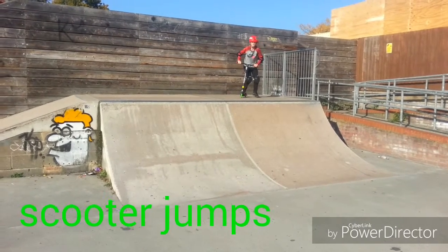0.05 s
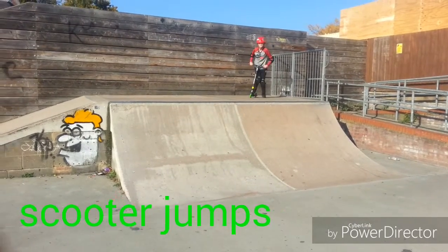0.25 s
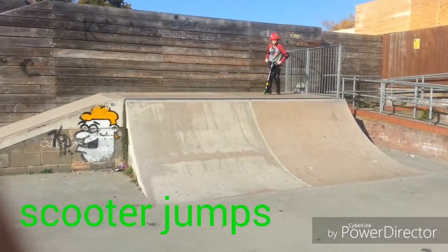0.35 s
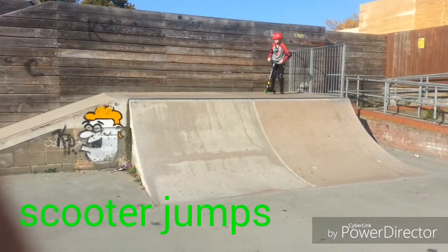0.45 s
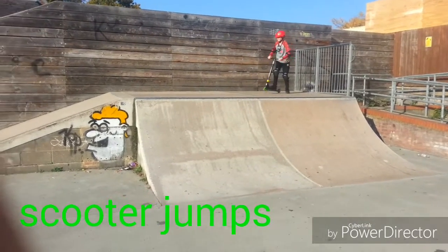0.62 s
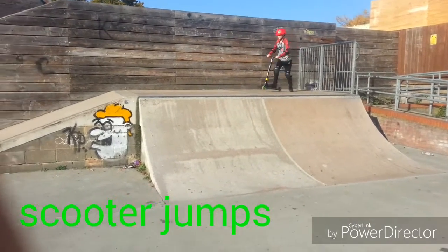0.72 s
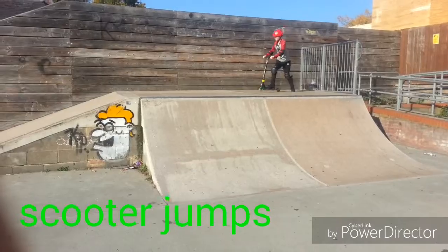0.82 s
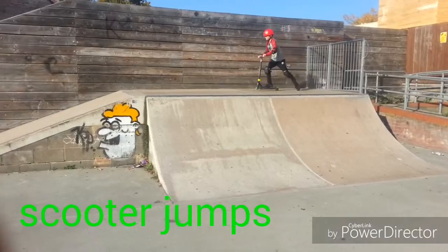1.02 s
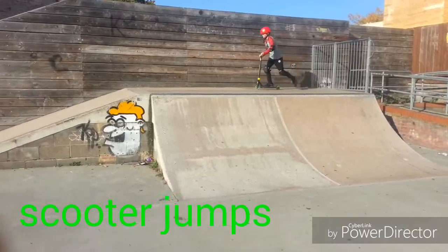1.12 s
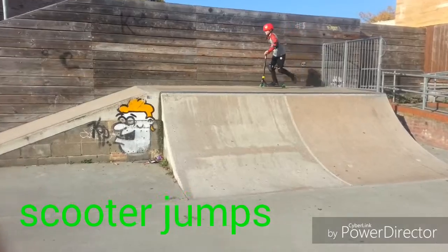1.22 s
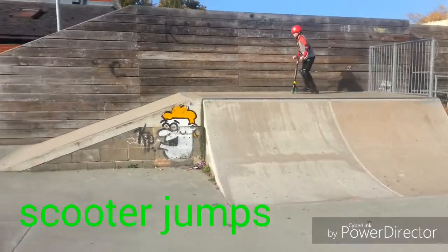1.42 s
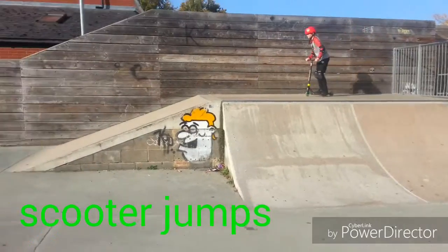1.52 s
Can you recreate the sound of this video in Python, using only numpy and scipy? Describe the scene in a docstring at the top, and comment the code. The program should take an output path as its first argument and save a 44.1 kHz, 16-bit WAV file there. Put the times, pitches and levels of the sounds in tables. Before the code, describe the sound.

Stunt scooter lands twice on concrete with rattling metallic knocks, over dull microphone handling thuds.

```python
"""A concrete skatepark. Close on the left a stunt scooter rolls, rattles and lands twice: knocks crack
through its deck and set its metal parts ringing. Farther off on the right another rolls along a ramp deck,
squeaks and clacks. Walls return a short echo, with the town faint in the distance. Right at the
microphones a finger shifting on the phone thuds and rumbles, mostly on the right one."""
import sys
import numpy as np
from scipy import signal
from scipy.fft import rfft, irfft
from scipy.io import wavfile
from scipy.ndimage import uniform_filter1d

SR = 44100
rng = np.random.default_rng(int(sys.argv[2]) if len(sys.argv) > 2 else 0)


def transcribe(signal):
    """Save signal, clipped to [-1, 1], as a 16-bit WAV file at the path in sys.argv[1]."""
    frames = np.atleast_2d(signal).T
    limited = np.clip(frames, -1, 1)
    pcm = np.round(limited * 32767).astype(np.int16)
    wavfile.write(sys.argv[1], SR, pcm)


N = 68355
T = np.arange(N) / SR

# near scooter's knocks: t/s, level/dB, t60/s, then offsets for body/dB, treble/dB, metal ring/dB
KNOCKS = [(.2055, -10.5, 0.041, 5, -3, -2), (0.2299, -10, 0.025, 7, 2, -6),
          (.2505, -12.5, 0.036, 0, 3, 0.5), (.264, -11, 0.055, -1.5, -1, -1.5),
          (.275, -15, 0.15, 0, 0.5, 2.5), (.295, -20, 0.087, -18, 8, -17),
          (0.319, -11, 0.048, -2.5, 0, -3.5), (0.333, -20.5, 0.075, 3, 7, -2),
          (0.351, -21.5, 0.2, -9, -1, 1), (0.388, -21, 0.21, -7, 1.5, 1), (0.399, -14, 0.044, -24, 1, 5),
          (.443, -19.5, 0.23, -20, 4, -11), (0.4602, -7.5, 0.052, 2.5, 5, -5),
          (.4745, -10, 0.083, 2.5, 6, -9), (0.553, -28.5, 0.053, 8, -12, 3.5),
          (0.577, -26.5, 0.052, 8, -6, -20), (0.589, -25, 0.044, 0, -13, -33),
          (0.849, -31.5, 0.15, 15, 7, -8), (.866, -30.5, 0.27, 8.5, 11, -22),
          (.889, -16.5, 0.046, 14.5, 15.5, -20), (.892, -9, 0.059, 4, 9, -10),
          (0.896, -16, 0.047, 3, 2, -26), (0.929, -24, 0.084, 2, -12, -3.5),
          (1.005, -24.5, 0.051, 7.5, -22, -14), (1.057, -38, 0.061, 11.5, 5, -6),
          (1.124, -43.5, 0.21, -14, 16, -11)]
# spectrum of a knock: f/Hz, level/dB
KNOCK_COLOUR = [(100, -18), (350, -4.5), (560, -3.5), (800, -1.5), (1500, -1), (1850, -2.5), (2200, 3.5),
                (2650, -0.5), (3300, 3), (4300, -1), (5300, -3.5), (6200, -7.5), (8500, -14.5),
                (10600, -12), (11600, -31), (13000, -40), (13900, -39), (15000, -56)]
# short resonances of the deck: f/Hz, width/Hz, level/dB
DECK_MODES = [(819, 29, -5.5), (960, 55, -6.5), (1236, 78, -5), (1479, 54, -1.5), (2160, 90, -12),
              (3110, 90, -10.5), (3760, 57, -9), (4140, 47, 8), (4510, 47, -4), (5340, 120, -4.5),
              (7700, 53, -1), (8550, 69, -1), (9290, 51, 3), (10490, 130, 0)]
# modes of bar and fork: f/Hz
METAL_HZ = [780, 825, 1670, 2160, 3108, 3543, 3768, 3964, 4190, 4383, 4570, 4817, 4880, 5090, 5280, 5640]
# strength and decay of those modes: level/dB, t60/s
METAL_RING = [(-15.5, 0.23), (-16, .25), (-17.5, 0.33), (-19, 0.36), (-18, 0.21), (-11.5, 0.26), (-8, 0.24),
              (-4, 0.29), (-1, 0.16), (-4.5, 0.32), (-7.5, 0.2), (-10, 0.14), (-2.5, 0.14), (-11, 0.12),
              (-8, 0.14), (-9, .12)]
# hollow tocks of wheels meeting concrete: t/s, level/dB, f/Hz, t60/s
WHEEL_TOCKS = [(.2055, -9, 704, 0.022), (.2297, -21, 1130, 0.062), (.4608, -17.5, 825, 0.13),
               (.801, -30, 610, 0.024), (.8915, -13.5, 924, 0.018)]
# thin, very high pings at some knocks: t/s, level/dB
HIGH_PINGS = [(0.291, -39.5), (.47, -44), (0.869, -38), (.893, -55), (1.124, -40.5)]
# near wheels rolling: t/s, level/dB
NEAR_ROLL = [(.2, -27), (.3, -27.5), (.45, -28.5), (.53, -31.5), (.62, -45), (.69, -54), (.83, -52),
             (.91, -33.5), (1.02, -45), (1.15, -50.5), (1.4, -53)]
# their spectrum: f/Hz, level/dB
NEAR_ROLL_COLOUR = [(150, -12.5), (450, -4), (800, -0.5), (1500, -8), (1900, -3.5), (2600, -8.5), (3300, 3),
                    (4200, 3.5), (5300, -8), (6300, -11.5), (10000, -12.5), (12000, -27), (15000, -35)]
# near scooter across the microphones: f/Hz, left minus right/dB
NEAR_BALANCE = [(300, -0.5), (900, 1), (2000, 0.5), (2700, 3), (3500, 4), (4500, -8), (7000, -6.5),
                (11000, -5.5), (14000, -0.5)]
# far scooter's clacks: t/s, level/dB, t60/s, treble offset/dB, ring offset/dB, left minus right/dB
CLACKS = [(1.171, -46, 0.022, -9, -3, -7), (1.184, -26, 0.023, -16, -4, -5),
          (1.2011, -25.5, 0.011, -16, -2, -5.5), (1.234, -36.5, 0.044, 3, -7, -3),
          (1.4297, -23, 0.034, -1, -2, -1), (1.4338, -20, 0.028, 8.5, 0, -4),
          (1.464, -30.5, 0.2, 5, -16, -21), (1.4678, -28, 0.015, -7, -4, -9)]
# spectrum of a clack: f/Hz, level/dB
CLACK_COLOUR = [(200, -12.5), (1000, -1.5), (1500, -1), (2000, 2.5), (2800, 5.5), (3800, 1), (4900, 2),
                (6300, -12.5), (8800, -10.5), (11500, -21), (15000, -41)]
# its hollow ring: f/Hz, level/dB, t60/s
CLACK_MODES = [(1007, -17, 0.088), (1855, -4, 0.032), (2330, 2.5, 0.017), (2767, 2.5, 0.025),
               (3100, -8, 0.091), (4820, -6.5, 0.023)]
# far wheels rolling: t/s, level/dB
FAR_ROLL = [(.2, -44), (.8, -46), (1.2, -43.5), (1.3, -47.5), (1.415, -47), (1.45, -36.5), (1.49, -34),
            (1.55, -37.5)]
# their spectrum: f/Hz, level/dB
FAR_ROLL_COLOUR = [(120, -25), (300, -1), (700, -2), (1000, 4.5), (1600, 1.5), (2300, 6), (2750, -2.5),
                   (3150, 5), (3900, -0.5), (5000, -4.5), (6000, -9.5), (9000, -16.5), (11000, -20),
                   (15000, -43)]
# thin wheel squeaks: t/s, length/s, f/Hz, level/dB
SQUEAKS = [(0.758, 0.022, 3480, -39), (1.249, 0.065, 2520, -39.5), (1.33, .06, 2500, -63)]
# finger thuds: t/s, level/dB, f/Hz, swell time constant/s, left minus right/dB
THUDS = [(0.275, -12, 248, 0.0021, -20), (0.371, -12, 216, 0.0017, -25), (0.381, -19, 174, 0.0012, -18),
         (.427, -17, 254, 0.0054, -31), (0.4628, -4.5, 313, 0.0016, 24), (0.4867, -5, 292, 0.001, -27),
         (0.499, -7, 302, 0.00094, -31), (0.524, -21.5, 260, 0.0014, -10), (0.57, -18, 162.5, 0.0035, -8.5),
         (0.623, -19, 234, 0.0016, -37), (.638, -12, 305, 0.00081, -34), (.650, -19, 282, .002, -27),
         (.661, -14.5, 260, 0.0014, -29), (0.677, -24, 219, 0.0035, -27), (0.69, -21.5, 187, 0.0018, -28),
         (0.8337, -9, 260, .0014, -30), (.961, -10.5, 258, 0.0017, -29), (0.978, -13.5, 204, 0.0014, -27),
         (1.082, -16.5, 250, 0.0013, -14), (1.095, -24, 196, 0.0029, -23), (1.180, -19, 240, 0.00069, -26),
         (1.26, -30.5, 176, .002, -32), (1.341, -37.5, 226, 0.006, 1.5)]
# finger rubbing: t/s, level/dB
RUB = [(.2, -37), (.28, -25.5), (.35, -26.5), (.46, -24.5), (.52, -26.5), (.6, -26), (.68, -24.5),
       (.72, -39.5), (.8, -47), (.85, -21), (.92, -27), (1.02, -34), (1.14, -28.5), (1.21, -42.5),
       (1.36, -47), (1.55, -60)]
# its spectrum: f/Hz, level/dB
RUB_COLOUR = [(25, -47), (55, -15.5), (100, -0.5), (170, 2), (290, -6), (420, -12), (600, -25),
              (1500, -51.5), (4000, -83)]
# spectrum of the distant town: f/Hz, level/dB
TOWN_COLOUR = [(30, -17), (110, -2), (230, -2), (500, -2.5), (900, -11), (1800, -10.5), (2400, -7.5),
               (3000, -24), (5200, -19), (5900, -22.5), (9500, -25.5), (13000, -26), (15000, -40)]

NEAR_LAG_S, FAR_LAG_S = 0.0002414, -0.000379  # arrival at the right microphone after the left
NEAR_APART, FAR_APART = 0.52, 0.43  # gain of the noise each microphone hears alone
RING_DB, RING_SCATTER_DB, RING_SKEW_RAD = -10.5, 2.5, 0.74
FLUTTER_DB, FLUTTER_HZ = 4, 45
PING_HZ, PING_WIDTH_HZ = 14000, 310
ECHO_DB, ECHO_T60_S, ECHO_TREBLE_T60_S, ECHO_BUILD_S = -10, 0.61, 0.22, 0.005
START_S, LOW_CUT_HZ, TOP_HZ = 0.203, 36, 14800


def near_scooter():
    """Close left: deck, metal, pings and wheels, coloured differently at each microphone."""
    left, right = deck() + metal() + high_pings() + near_wheels()
    left = colour(left, [(hz, db / 2) for hz, db in NEAR_BALANCE], keep_power=False)
    right = colour(right, [(hz, -db / 2) for hz, db in NEAR_BALANCE], keep_power=False)
    return np.vstack([left, right])


def deck():
    """Knocks crack in three bands, heard directly and through the deck's resonances."""
    crack = colour(mic_pair(NEAR_LAG_S, NEAR_APART, grain=0.42, rate_hz=900), KNOCK_COLOUR)
    body, rest = split(crack, 1890)
    middle, treble = split(rest, 6120)
    power = np.zeros((3, N))
    for start, db, t60, body_db, treble_db, _ in KNOCKS:
        band_gains = amp(db + np.array([[body_db], [0], [treble_db]]))
        power += (band_gains * blow(start, t60, attack=0.0015)) ** 2
    knocks = sum(np.sqrt(p) * band for p, band in zip(power, (body, middle, treble)))
    return amp(-3) * knocks + sum(amp(db) * resonate(knocks, hz, width) for hz, width, db in DECK_MODES)


def metal():
    """Each knock rings bar and fork with its own mix of modes, which flutter as the moving scooter turns."""
    starts, knock_db, *_, ring_db = np.array(KNOCKS).T
    out = np.zeros((2, N))
    for hz, (db, t60) in zip(METAL_HZ, METAL_RING):
        scatter, turn, skew = rng.standard_normal((len(starts), 3)).T
        push_db = knock_db + ring_db + RING_DB + db + RING_SCATTER_DB * scatter
        left = amp(push_db) * np.exp(2j * np.pi * turn)
        right = left * np.exp(1j * (RING_SKEW_RAD * skew - 2 * np.pi * hz * NEAR_LAG_S))
        taps = np.zeros((2, N), complex)
        taps[:, (starts * SR).astype(int)] = left, right
        pole = np.exp((2j * np.pi * hz - np.log(1000) / t60) / SR)
        flutter = unit(amp(FLUTTER_DB * wander(FLUTTER_HZ)))
        out += flutter * signal.lfilter([1], [1, -pole], taps).imag
    return split(out, 9300)[0]


def near_wheels():
    """Wheels meet the concrete with hollow tocks and roll grittily over it."""
    tocks = sum(amp(db) * tone(start, hz, t60, NEAR_LAG_S) for start, db, hz, t60 in WHEEL_TOCKS)
    roll = colour(mic_pair(NEAR_LAG_S, NEAR_APART, grain=0.38, rate_hz=400), NEAR_ROLL_COLOUR)
    return tocks + curve(NEAR_ROLL) * roll


def high_pings():
    """Thin, very high pings sound at some of the knocks."""
    band = resonate(rng.standard_normal((2, N)), PING_HZ, PING_WIDTH_HZ)
    band = unit(resonate(band, PING_HZ, PING_WIDTH_HZ))
    return band * sum(amp(db) * blow(start, t60=0.21, attack=0.0025) for start, db in HIGH_PINGS)


def far_scooter():
    """Farther right: wheels roll on a ramp deck; each clack is a crack and a hollow ring."""
    contacts = colour(mic_pair(FAR_LAG_S, FAR_APART, grain=0.45, rate_hz=600), CLACK_COLOUR)
    low, high = split(contacts, 3900)
    roll = colour(mic_pair(FAR_LAG_S, FAR_APART, grain=0.46, rate_hz=600), FAR_ROLL_COLOUR)
    out = curve(FAR_ROLL) * roll
    for start, db, t60, treble_db, ring_db, pan_db in CLACKS:
        crack = blow(start, t60, attack=0.00088) * (low + amp(treble_db) * high)
        ring = sum(amp(level) * tone(start, hz, decay, FAR_LAG_S) for hz, level, decay in CLACK_MODES)
        out += amp(db) * sides(pan_db) * (crack + amp(ring_db) * ring)
    return out


def wheel_squeaks():
    """Brief tones of wavering pitch, alike at both microphones."""
    out = np.zeros(N)
    for start, length, hz, db in SQUEAKS:
        waver = 1 + 0.0098 * unit(uniform_filter1d(rng.standard_normal(N), size=150))
        arch = np.sin(np.pi * np.clip((T - start) / length, 0, 1))
        out += amp(db) * arch * np.sin(2 * np.pi * np.cumsum(hz * waver) / SR)
    return out


def finger():
    """Handling noise: skin sticks and slips on the case, in dull thuds over an uneven rumble."""
    rub = colour([grit(grain=0.41, rate_hz=120) for _ in range(2)], RUB_COLOUR)
    out = rub * curve(RUB) * sides(-18.5)
    for start, db, hz, swell, pan_db in THUDS:
        age = np.clip(T - start, 0, 20 * swell)
        shape = (age / (2 * swell)) ** 2 * np.exp(2 - age / swell)
        out += amp(db) * sides(pan_db) * shape * np.sin(2 * np.pi * hz * age)
    return out


def walls(x):
    """Diffuse echo from ramps and fence; its treble dies first."""
    low, high = split(rng.standard_normal((2, N)), 5200)
    decay = blow(0, ECHO_T60_S, ECHO_BUILD_S)
    tail = (low * decay + high * blow(0, ECHO_TREBLE_T60_S, ECHO_BUILD_S)) / np.linalg.norm(decay)
    return amp(ECHO_DB) * signal.fftconvolve(x, tail, axes=1)[:, :N]


def town():
    """The distant town: a faint, wide wash of noise."""
    return amp(-46.5) * colour(mic_pair(lag_s=0, apart=0.72, grain=0.15, rate_hz=29.1), TOWN_COLOUR)


def amp(db):
    return 10 ** (np.asarray(db) / 20)


def unit(x):
    return x / np.sqrt(np.mean(x ** 2))


def curve(rows):
    """Gain over time from rows of t/s, level/dB."""
    return amp(np.interp(T, *np.array(rows).T))


def sides(db):
    """Microphone gains for left minus right in dB; the louder stays at 1."""
    return amp(np.minimum([[db], [-db]], 0))


def colour(x, points, keep_power=True, size=4096):
    """Minimum-phase filter through rows of f/Hz, level/dB."""
    hz, db = np.array(points, float).T
    gain = amp(np.interp(np.log(np.fft.rfftfreq(size, 1 / SR) + 1), np.log(hz), db))
    cepstrum = irfft(np.log(gain))
    cepstrum[1:size // 2] *= 2
    cepstrum[size // 2 + 1:] = 0
    impulse = irfft(np.exp(rfft(cepstrum)))
    if keep_power:
        impulse /= np.linalg.norm(impulse)
    return signal.fftconvolve(np.atleast_2d(x), impulse[None], axes=1)[:, :N]


def split(x, hz):
    """The parts below and above a frequency."""
    low = signal.sosfiltfilt(signal.butter(4, hz, fs=SR, output="sos"), x)
    return low, x - low


def resonate(x, hz, width_hz):
    """One resonance, gain 1 at its centre."""
    return signal.lfilter(*signal.iirpeak(hz, hz / width_hz, fs=SR), x)


def wander(rate_hz):
    """A line through rate_hz random values a second."""
    return np.interp(T * rate_hz, np.arange(N), rng.standard_normal(N))


def grit(grain, rate_hz):
    """Noise of tiny contacts; more grain makes their strength less even."""
    strength = np.exp(grain * wander(rate_hz))
    return unit(rng.standard_normal(N) * strength)


def mic_pair(lag_s, apart, grain, rate_hz):
    """Grit at both microphones: a shared part, lag_s later on the right, and an unrelated part."""
    common, left, right = (grit(grain, rate_hz) for _ in range(3))
    shared = np.array([common, np.interp(T - lag_s, T, common)])
    return np.sqrt(1 - apart ** 2) * shared + apart * np.array([left, right])


def blow(start, t60, attack):
    """Quick rise and exponential fall; times in seconds."""
    age = np.maximum(T - start, 0)
    return (1 - np.exp(-age / attack)) * np.exp(-np.minimum(np.log(1000) * age / t60, 20))


def tone(start, hz, t60, lag_s):
    """One struck mode at both microphones."""
    age = T - start - np.array([[0], [lag_s]])
    return blow(start, t60, attack=0.00043) * np.sin(2 * np.pi * hz * age)


def scene():
    """Only the scooters reach the walls; town and finger stay dry."""
    scooters = near_scooter() + far_scooter() + wheel_squeaks()
    return scooters + town() + walls(scooters) + finger()


def record(dry):
    """The microphone ports ring high up; the sound cuts in, and deep bass and top are cut off."""
    port_ring = amp(3) * resonate(dry, hz=13750, width_hz=180)
    out = signal.sosfilt(signal.butter(2, LOW_CUT_HZ, "high", fs=SR, output="sos"), dry + port_ring)
    out *= np.clip((T - START_S) / 0.0018, 0, 1)
    return signal.sosfilt(signal.ellip(8, .2, 80, TOP_HZ, fs=SR, output="sos"), np.clip(out, -1, 1))


dry = scene()
out = record(dry)
transcribe(out)
```